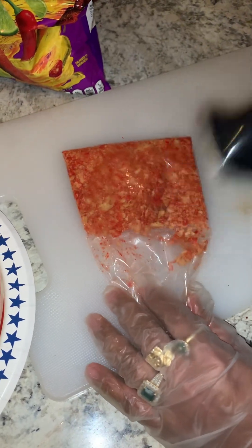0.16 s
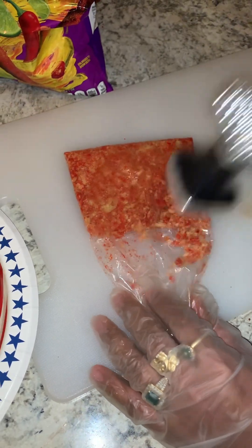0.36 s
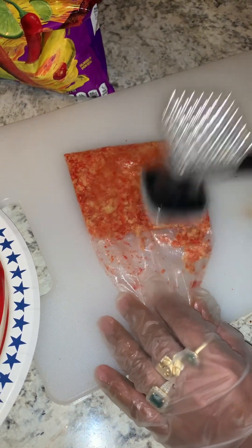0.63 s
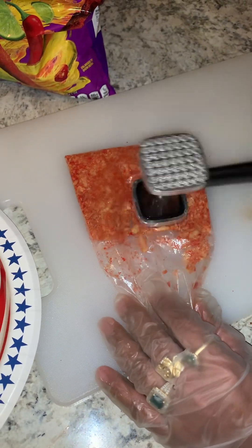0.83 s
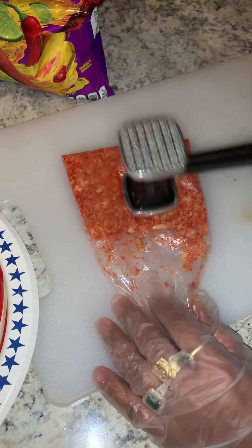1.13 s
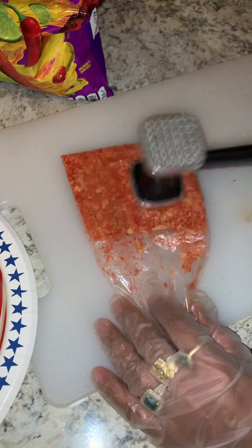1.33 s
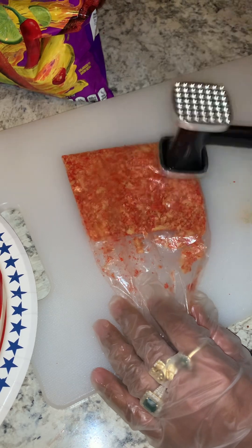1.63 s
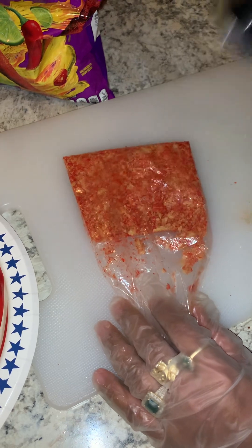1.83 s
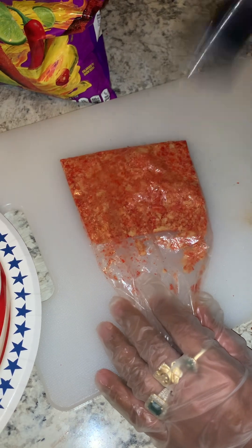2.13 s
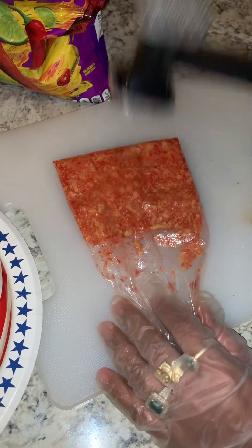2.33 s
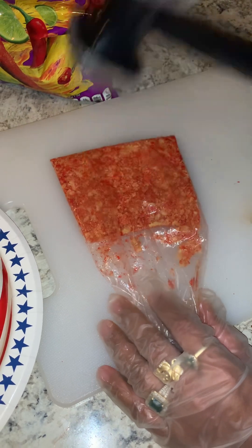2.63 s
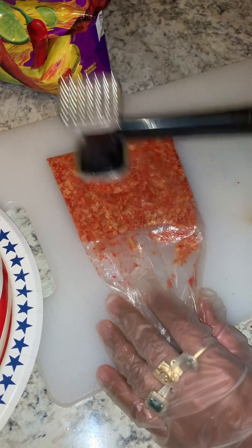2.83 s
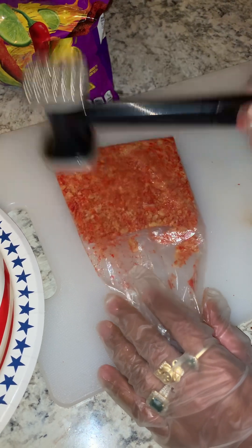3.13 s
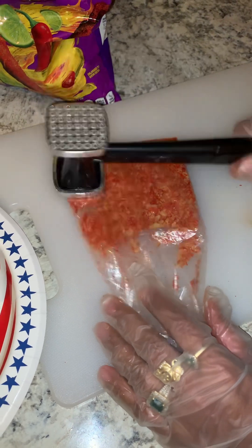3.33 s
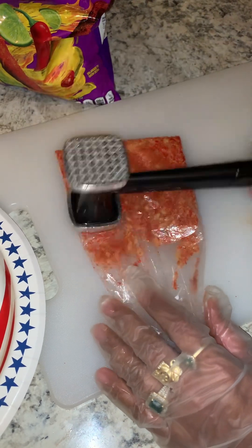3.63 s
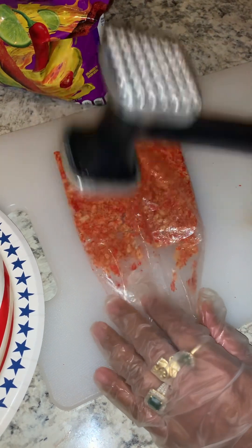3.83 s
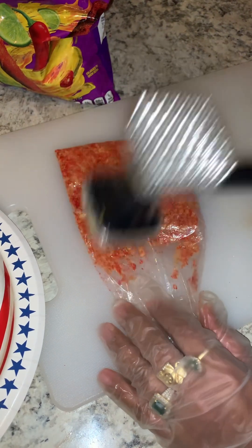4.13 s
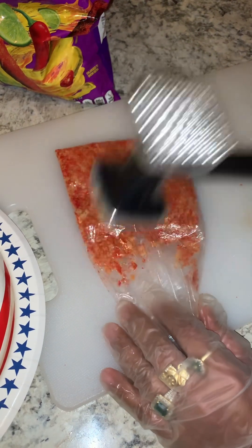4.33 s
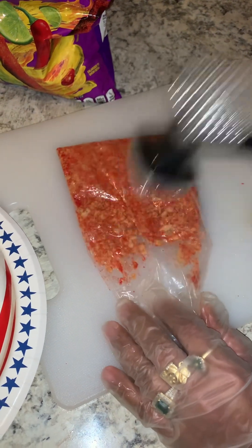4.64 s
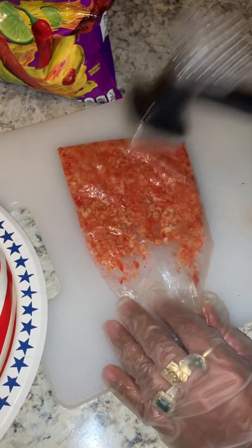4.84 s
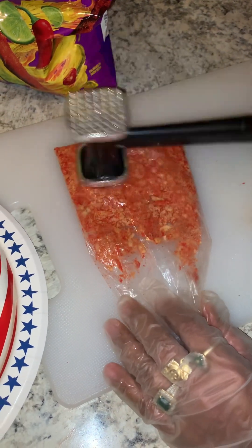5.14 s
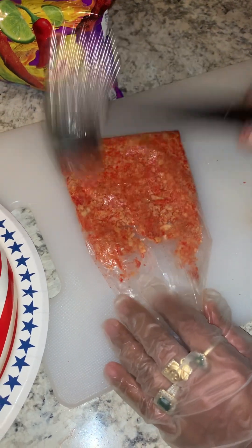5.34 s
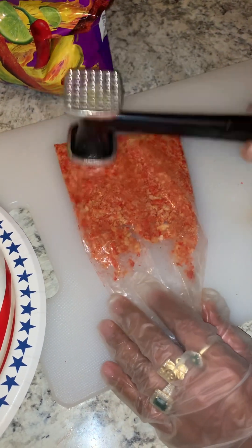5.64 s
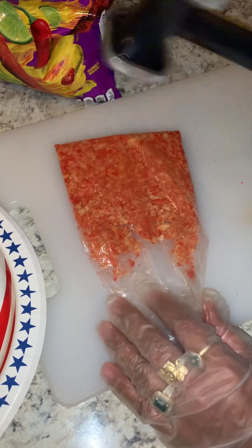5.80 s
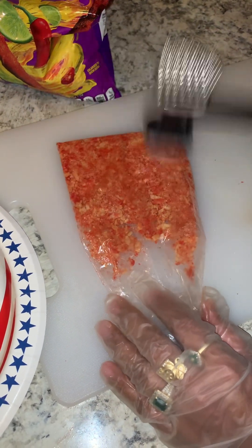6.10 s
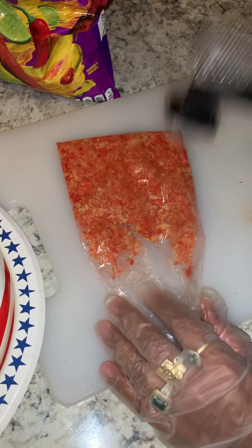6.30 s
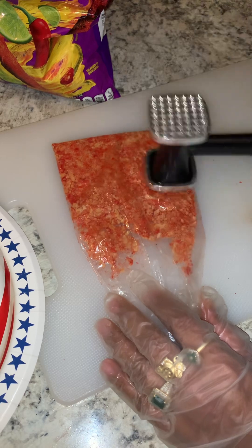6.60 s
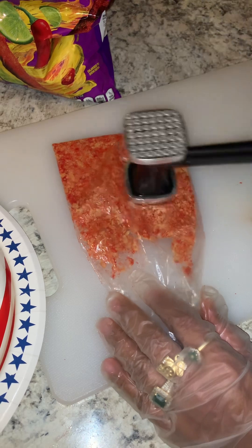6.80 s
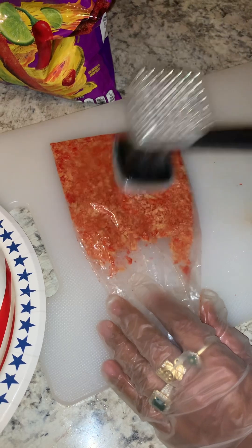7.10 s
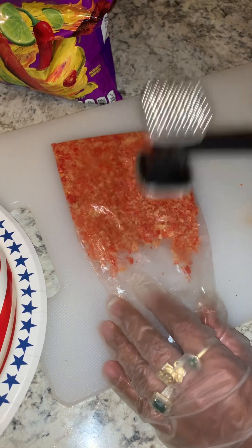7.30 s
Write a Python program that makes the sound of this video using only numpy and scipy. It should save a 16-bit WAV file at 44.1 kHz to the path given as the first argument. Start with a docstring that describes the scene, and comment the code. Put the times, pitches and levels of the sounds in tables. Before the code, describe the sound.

Steady pounding fills the stretch from start to end: a mallet head shatters crisp chips through plastic film, knocking the cutting board and shaking the counter below. Loudness, crispness and clack pitch vary from blow to blow. The bag rubs briefly on the board near two seconds. Short, lively kitchen reflections follow each hit, over faint rumble and a barely audible whine midway. Close phone pickup, stereo, loud peaks held down.

```python
"""Pounding chips in a bag

A metal mallet pounds crisp chips in a plastic bag on a cutting board, about four blows a second.
Each blow squeezes and shatters chips (bursts of tiny snaps), clacks on the board and thumps the
counter below (struck modes). A small hard kitchen answers with mirrored and scattered fading noise,
over low rumble, a faint whine and one short drag of the bag. A phone held close above picks it up."""
import sys
import numpy as np
from scipy import signal
from scipy.fft import rfft, irfft, next_fast_len
from scipy.io import wavfile
from scipy.ndimage import uniform_filter1d, minimum_filter1d

SR = 44100
rng = np.random.default_rng(int(sys.argv[2]) if len(sys.argv) > 2 else 0)


def dump_mix(stems):
    """Bounce the given channels to the path in sys.argv[1] as a 16-bit WAV at rate SR."""
    frames = np.atleast_2d(stems).T  # one column per channel
    limited = np.clip(frames, -1, 1)  # hard clip at full scale
    pcm = np.round(limited * 32767).astype(np.int16)
    wavfile.write(sys.argv[1], SR, pcm)


N = 328986

T = np.arange(SR // 2) / SR  # clock of one blow, seconds
LEAD_S = .03  # room for the squeeze ahead of contact
AGE = T - LEAD_S  # seconds since the mallet met the board
CLACK_HZ = 1270  # usual pitch of the clack


def undb(db):
    """Decibels to gain."""
    return 10 ** (np.asarray(db) / 20)


def burst(x, db):
    """Scale a short sound to its level, counted as if it lasted a fiftieth of a second."""
    return x * undb(db) / np.sqrt(np.sum(x ** 2) * 50 / SR + 1e-18)


def fade(t, t60):
    """Exponential decay from t = 0, silent before; t60 is the seconds to fall 60 dB."""
    return (t >= 0) * np.exp(-np.log(1000) * np.maximum(t, 0) / t60)


def on_log_axis(f, hz, values):
    """Join points by straight lines on a log-frequency axis."""
    return np.interp(np.log(f + 1), np.log(hz), values)


def colour(x, points, tilt_db=0):
    """Causal filter with the given spectrum, its treble tilted towards tilt_db per octave."""
    size = next_fast_len(x.shape[-1] + 4096)
    f = np.abs(np.fft.fftfreq(size, 1 / SR))
    gain_db = on_log_axis(f, *np.transpose(points)) + tilt_db * np.log2(1 + f / 2000)
    log_gain = np.log(undb(gain_db))
    # the Hilbert transform supplies minimum phase, so nothing sounds early
    response = np.exp(signal.hilbert(log_gain).conj())[:size // 2 + 1]
    return irfft(rfft(x, size) * response, size)[..., :x.shape[-1]]


def snaps(rate, spread_db):
    """Tiny fractures at random moments (rate per second), a few bigger than the rest."""
    chance, size = rng.random(len(T)), rng.exponential(size=len(T))
    sign = np.sign(rng.standard_normal(len(T)))
    return (chance < rate / SR) * sign * undb(spread_db * np.minimum(size, 4))


def ring(modes, delay, scatter_db, detune, stretch=1):
    """Modes struck once; neighbours swing opposite ways, and the spot struck changes their weights."""
    hz, db, t60 = np.transpose(modes)[:, :, None]
    weight, shift = rng.standard_normal((2, len(modes), 1))
    sign = -(-1) ** np.arange(len(modes))[:, None]
    t = AGE - delay
    swing = np.sin(2 * np.pi * hz * stretch * (1 + detune * shift) * t)
    return np.sum(sign * undb(db + scatter_db * weight) * swing * fade(t, t60), axis=0)


def ports(x):
    """Two microphone ports: alike in the bass, out of step in the treble, varying with each sound."""
    # Left port against right. Each row: frequency in Hz, phase lead in radians, level in dB.
    port_offsets = [(100, .15, -2.4), (280, .2, .3), (520, .7, 0), (900, .3, -1.3), (1500, .1, -1.2),
                    (2000, 1, -2), (2300, 1.9, -3), (3300, 2.1, -.2), (4100, 1.9, 0), (4800, 3.3, 0),
                    (7300, 6.3, 0), (9700, 9.4, 0), (12300, 12.5, 0), (14500, 15, 0)]
    size = next_fast_len(len(x))
    f = np.fft.rfftfreq(size, 1 / SR)
    hz, lead, db = np.transpose(port_offsets)
    lead = lead + .45 * rng.standard_normal() * np.minimum(hz / 4000, 1)
    # each port takes half the offset
    left = undb(np.interp(f, hz, db) / 2) * np.exp(.5j * np.interp(f, hz, lead))
    return irfft(rfft(x, size) * np.array([left, 1 / left]), size)[:, :len(x)]


def diffuse(size):
    """Stereo noise from all directions: long waves reach both ports alike."""
    # Likeness of the ports in a diffuse field. Each row: frequency in Hz, correlation from -1 to 1.
    port_likeness = [(60, .99), (130, .98), (290, .87), (640, .5), (1410, .2), (3100, -.44), (6800, -.2),
                     (15000, .3)]
    mid, side = rfft(rng.standard_normal((2, size)))
    alike = on_log_axis(np.fft.rfftfreq(size, 1 / SR), *np.transpose(port_likeness))
    mid = mid * np.sqrt((1 + alike) / 2)
    side = side * np.sqrt((1 - alike) / 2)
    return irfft(mid + np.array([[1], [-1]]) * side, size)


def background(level_db=-57):
    """Low room rumble of shaped diffuse noise, and faint sine whines that come and go."""
    # Spectrum of the rumble. Each row: frequency in Hz, relative level in dB.
    rumble_spectrum = [(25, -11), (65, 13.5), (110, -5), (220, 2), (450, -23.5), (750, -26.5),
                       (1500, -17.5), (3000, -23.5), (6500, -22.5), (10000, -62), (16000, -60.5)]
    # Steady tones in the room. Each row: frequency in Hz, rms level in dB when fully up.
    whine_tones = [(694, -68), (781, -68), (926, -62)]
    rumble = colour(diffuse(next_fast_len(N))[:, :N], rumble_spectrum)
    t = np.arange(N) / SR
    whine = sum(undb(db) * np.sqrt(2) * np.sin(2 * np.pi * hz * t) for hz, db in whine_tones)
    whine_swell = np.interp(t, [2.4, 3.4, 4.9, 6.2], [0, 1, 1, 0])
    return undb(level_db) * rumble / np.std(rumble) + whine_swell * whine


def slide(start_s=1.93, length_s=0.17, level_db=-34):
    """The bag is dragged a little: its film sticks and slips on the board, swelling and fading."""
    # Rub of film on board. Each row: frequency in Hz, relative level in dB.
    rub_spectrum = [(150, -20), (400, -1), (550, 7), (800, -1), (1400, -9.5), (3000, -22), (9000, -42)]
    speed = np.sin(np.pi * np.minimum(T / length_s, 1))
    rub = ports(burst(colour(snaps(rate=1600, spread_db=2.0) * speed, rub_spectrum), level_db))
    start = int(start_s * SR)
    return np.pad(rub, [(0, 0), (start, N - start - len(T))])


def kitchen_decays(first_s=0.0056, swell_s=0.00094):
    """Passband and envelope of each band: near cabinets decay quickly, the room beyond long and faint."""
    # Reverberation by band. Each row: centre in Hz, early level in dB, early t60 in seconds,
    # late level in dB, late t60 in seconds.
    reverb_bands = [(71, -18, 0.66, -20, 0.87), (141, -11, 0.12, -21.5, 0.72), (300, -7.5, 0.26, -23, 1),
                    (510, -9, 0.22, -25.5, 0.73), (688, -1, 0.17, -14.5, 0.62),
                    (1080, -11, 0.14, -18.5, 0.43), (1500, -9.5, 0.18, -20, 0.57),
                    (2760, -10.5, 0.19, -24.5, 0.68), (5050, -8.5, 0.097, -20, 0.42),
                    (6340, -7.5, 0.2, -18, 0.51), (9300, -22.5, 0.1, -28, 0.14),
                    (14500, -10.5, 0.24, -67.5, .3)]
    f = np.fft.rfftfreq(len(T), 1 / SR)
    centres = np.transpose(reverb_bands)[0]
    supported = f ** 2 / (f ** 2 + 35 ** 2)  # a small room holds no very long waves
    decays = []
    for row, band in zip(reverb_bands, np.eye(len(reverb_bands))):
        hz, early_db, early_t60, late_db, late_t60 = row
        swell = np.clip((AGE - first_s) / (swell_s + 2 / hz), 0, 1)  # the lows build up later
        early, late = swell * fade(AGE, early_t60), swell * fade(AGE, late_t60)
        early = undb(early_db) * early / np.linalg.norm(early)
        late = undb(late_db) * late / np.linalg.norm(late)
        decays.append((supported * on_log_axis(f, centres, band), np.hypot(early, late)))
    return decays


def diffuse_decay(sound, decays):
    """The room gathers sound sent in all directions and returns each band's energy as fading noise."""
    power, noise = np.abs(rfft(sound)) ** 2, rfft(diffuse(len(T)))
    total = 0
    for band, envelope in decays:
        strength = np.sqrt(np.average(power, weights=band ** 2))
        total = total + strength * envelope * irfft(noise * band, len(T))
    return total


def kitchen(blow, decays, reflections):
    """Flat cabinet fronts mirror the blow with its own colour; the rest is scattered."""
    mirror_share = .4  # of the energy
    mirrored = signal.fftconvolve(blow[None], reflections, axes=1)[:, :len(T)]
    scattered = diffuse_decay(blow, decays)
    return np.sqrt(mirror_share) * mirrored + np.sqrt(1 - mirror_share) * scattered


def bag(crack_db, settle_t60=0.25, below_db=-21, lift_db=-14, lift_t60=0.11):
    """Crumbs settle after the blow, and the film crinkles once more as the mallet lifts."""
    # Crinkle of crumbs and film. Each row: frequency in Hz, relative level in dB.
    crinkle_spectrum = [(400, -4.5), (1400, 1.5), (3000, 3.5), (6300, -2.5), (9000, -13), (15000, -18)]
    settling = fade(AGE - .02, settle_t60)
    lifting = undb(lift_db) * fade(AGE - rng.uniform(0.063, 0.19), lift_t60)
    crinkle = colour(snaps(rate=550, spread_db=0.5) * (settling + lifting), crinkle_spectrum)
    return burst(crinkle, crack_db + below_db)


def counter(db):
    """The blow sinks through the board and sets counter and cabinet swinging."""
    # Counter and cabinet modes. Each row: frequency in Hz, relative level in dB, t60 in seconds.
    counter_modes = [(58.5, -11.5, 0.24), (81.5, -5.5, 0.18), (129.6, -0.5, 0.096), (187.5, -4, 0.048)]
    return burst(ring(counter_modes, delay=0.0024, scatter_db=1.03, detune=0.01), db)


def jolts(share, t60):
    """Force of one blow: first contact, then smaller jolts as chips give way, until the head rebounds."""
    contact_s = .009
    after = snaps(rate=8000, spread_db=1.5) * fade(T, t60) * (T < contact_s)
    return (T == 0) + share * after / np.sqrt(np.sum(after ** 2) + 1e-18)


def board(knock_db, clack_db, clack_hz):
    """The jolts ring the board's low modes and its stiff ones, whose pitch depends on the spot."""
    # Cutting board lying on the counter. Each row: frequency in Hz, relative level in dB, t60 in seconds.
    board_modes = [(247.8, -9.5, 0.079), (284.2, 1.5, 0.027), (436, -1, 0.015), (486.3, -4.5, 0.032),
                   (689, -13, 0.039), (702.5, -17, 0.11), (759, -10, 0.023)]
    # Stiff modes of board and mallet head for a blow at the usual spot.
    # Each row: frequency in Hz, relative level in dB, t60 in seconds.
    clack_modes = [(873, -7, 0.025), (1037, -2, 0.03), (1298, 3.5, 0.018), (1495, -2, 0.017),
                   (1679, -4.5, 0.024), (2165, -5, 0.009)]
    knock = ring(board_modes, delay=0.0023, scatter_db=2.5, detune=0.022)
    clack = ring(clack_modes, delay=0.00018, scatter_db=1.5, detune=0.051, stretch=clack_hz / CLACK_HZ)
    knock = signal.fftconvolve(knock, jolts(share=0.33, t60=0.062))[:len(T)]
    clack = signal.fftconvolve(clack, jolts(share=1.0, t60=0.049))[:len(T)]
    return burst(knock, knock_db) + burst(clack, clack_db)


def mallet(crack_db, below_db=-6.5):
    """The metal head rings briefly, differently with every tilt of its face."""
    # Rings of the mallet head. Each row: frequency in Hz, relative level in dB, t60 in seconds.
    head_modes = [(2665, -11, 0.02), (2927, 5, 0.031), (3980, -10, 0.046), (5290, 4, 0.018),
                  (6600, -8, 0.031)]
    return burst(ring(head_modes, delay=0.000459, scatter_db=4.0, detune=0.011), crack_db + below_db)


def chips(crack_db, squeeze_db, bright_db, build_t60=0.033, crack_t60=0.032, bite_s=0.0027,
          crack_trim_db=3.0):
    """Chips crunch ever harder as the head sinks in, then shatter all at once against the board."""
    # Crunch before contact. Each row: frequency in Hz, relative level in dB.
    squeeze_spectrum = [(150, -8), (550, -0.5), (1500, 2), (2200, -4.5), (2900, 3), (4000, -5.5),
                        (6000, -11), (9000, -26), (15000, -70.5)]
    # Crack after contact. Each row: frequency in Hz, relative level in dB.
    shatter_spectrum = [(500, -25), (1500, -6.5), (2300, 1.5), (3000, -2.5), (3500, -5.5), (4100, -0.5),
                        (5000, -7), (6200, -8.5), (8000, -14.5), (10000, -20.5), (13000, -21.5),
                        (16000, -42.5)]
    crumbling = snaps(rate=7000, spread_db=4)
    squeeze = colour(crumbling * fade(-AGE, build_t60), squeeze_spectrum)
    # full pressure for the bite, then a decay
    pressure = (AGE > 0) * fade(np.maximum(AGE - bite_s, 0), crack_t60)
    shatter = colour(snaps(rate=3000, spread_db=3) * pressure, shatter_spectrum, bright_db)
    return burst(squeeze, squeeze_db) + burst(shatter, crack_db + crack_trim_db)


def strike(weight_db, crisp_db, heap_db, swing_s, bright_db):
    """One blow: its weight moves counter and board, its swing makes the clack, the chips crunch."""
    # base levels of a usual blow; crack is the reference for chips, bag and mallet head
    thump_db, knock_db, clack_db, crack_db, squeeze_db = -12, -17, -14.5, -24, -29.5
    knock_per_weight = 1.24  # dB per dB: a heavy blow presses the board flat and knocks it harder
    full_swing_s, quick_clack_db = .224, -3.5  # a quicker stroke falls from lower down and clacks less
    # the clack is higher on a deep heap, and differs from spot to spot
    octaves_per_db, spread_octaves = 0.0244, 0.063
    clack_db = clack_db + quick_clack_db * (swing_s < full_swing_s)
    clack_octaves = octaves_per_db * heap_db + spread_octaves * rng.uniform(-0.83, 1)
    clack_hz = CLACK_HZ * 2 ** clack_octaves
    crack_db = crack_db + crisp_db
    body = counter(thump_db + weight_db)
    body = body + board(knock_db + knock_per_weight * weight_db, clack_db, clack_hz)
    head = mallet(crack_db)
    crunch = chips(crack_db, squeeze_db + heap_db, bright_db)
    return body + head + crunch + bag(crack_db)


def pounding():
    """All the blows with their reverberation; an earlier one is still dying away at the start."""
    # The blows, levels against a usual one. Each row: contact in seconds, weight behind it in dB,
    # crispness of the chips under it in dB, depth of the heap in dB.
    blow_list = [(0.2199, 2, 2, -1), (0.502, 2, 2, 5), (0.7752, 3.5, 4.5, -2), (1.0471, 2, 2, 3.5),
                 (1.3296, 0.5, -3, 2.5), (1.615, 3.5, -2, 3), (1.882, 4, 0, 4.5), (2.1711, 1.5, -4, -1),
                 (2.4492, 1.5, 2.5, 1), (2.729, -.5, 0, 6), (3.0229, -.5, 4, 2.5), (3.3087, -1, 0, 5.5),
                 (3.599, -1, -1, 5.5), (3.9008, -1.5, 1.5, -0.5), (4.185, -5, 1, -1),
                 (4.4369, -2.5, 2.5, -1.5), (4.6674, -.5, 1.5, -0.5), (4.8742, -0.5, -.5, 1),
                 (5.0886, 0.4, 3.5, 0.5), (5.3471, -1.5, -.5, -2), (5.6136, -2, 3.5, 5),
                 (5.8645, 0.1, -2.5, -3), (6.1103, 0, -2.5, -3), (6.3268, -0.5, -5, -7.5),
                 (6.5477, -0.5, -4.5, -3.5), (6.7751, -1, -0.5, 2), (6.9805, -3, 2.5, -1.5),
                 (7.194, -4.5, 0, -3.5)]
    # Brightness of the crack as the mallet wanders over the bag, lower on coarse pieces.
    # Each row: time in seconds, treble tilt in dB per octave.
    brightness = [(.2, -0.5), (2.17, 2.5), (2.45, -2.5), (3.02, -2), (3.31, 1.5), (3.9, -1.3), (5.3, -.4),
                  (6.1, 0.5), (7.2, -.3)]
    earlier_blow = (-.066, 0, 0, 0)
    track, decays = np.zeros((2, N + 2 * SR)), kitchen_decays()  # a spare second at each end
    reflections = diffuse_decay(1. * (T == 0), decays)[:, int(LEAD_S * SR):]
    last_s = -np.inf
    for s, weight_db, crisp_db, heap_db in [earlier_blow, *blow_list]:
        bright_db = np.interp(s, *np.transpose(brightness))
        blow = strike(weight_db, crisp_db, heap_db, s - last_s, bright_db)
        start, last_s = SR + int((s - LEAD_S) * SR), s
        track[:, start:start + len(T)] += ports(blow) + kitchen(blow, decays, reflections)
    return track[:, SR:SR + N]


def scene():
    """The pounding and the drag of the bag in the quiet room."""
    return pounding() + background() + slide()


def record(dry):
    """The phone's limiter holds down the peaks, and the top is cut by a steep lowpass."""
    ceiling, size, top_hz = .9, int(.0012 * SR), 15400
    gain = ceiling / np.maximum(np.abs(dry).max(axis=0), ceiling)
    gain = uniform_filter1d(minimum_filter1d(gain, size), size)
    lowpass = signal.ellip(8, .2, 70, top_hz, fs=SR, output="sos")
    return signal.sosfilt(lowpass, dry * gain)


dry = scene()
out = record(dry)
dump_mix(out)
```